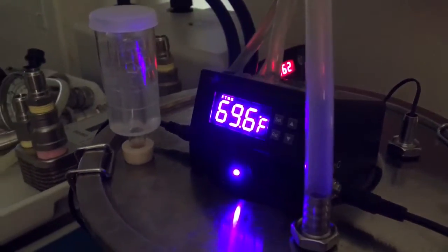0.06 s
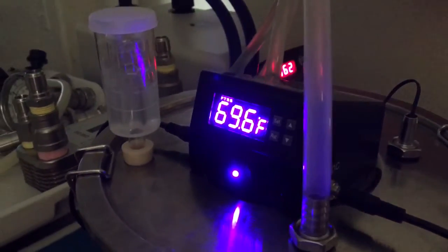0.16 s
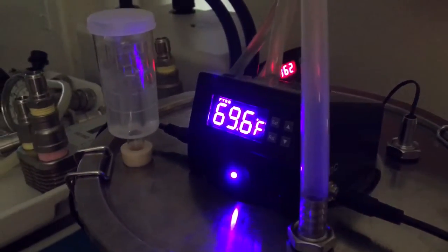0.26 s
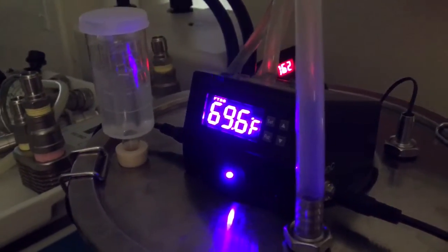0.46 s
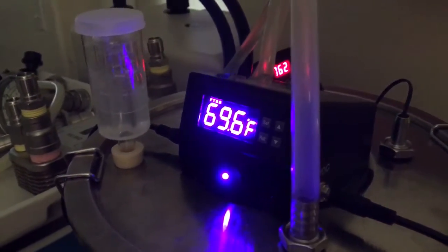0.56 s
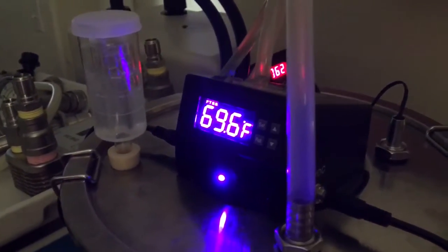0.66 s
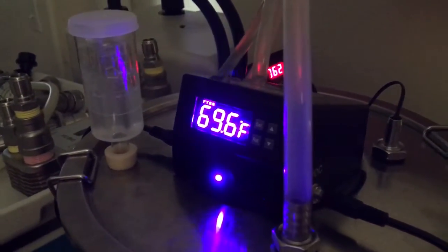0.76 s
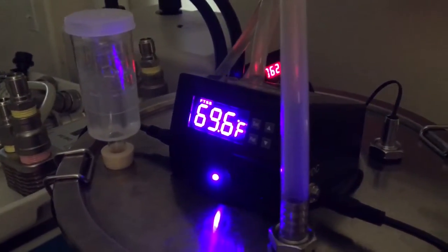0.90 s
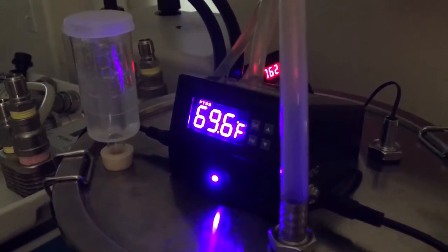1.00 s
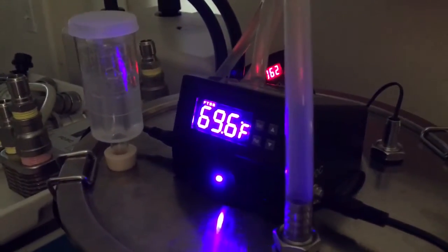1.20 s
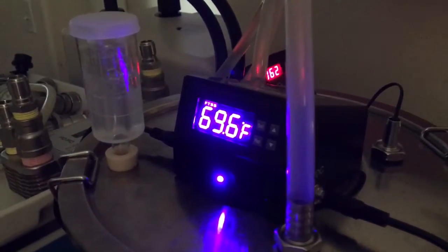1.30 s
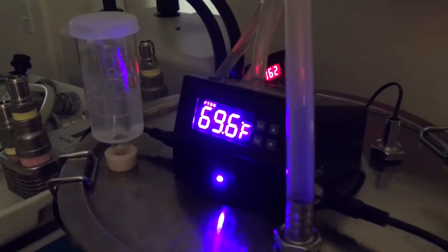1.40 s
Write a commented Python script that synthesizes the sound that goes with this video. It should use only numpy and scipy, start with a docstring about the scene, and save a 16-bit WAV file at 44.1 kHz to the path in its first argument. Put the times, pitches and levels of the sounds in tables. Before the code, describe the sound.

Gas glugs through a plastic airlock in fading, uneven bubbles over low room hum.

```python
"""A low hum fills a small room; then comes one big gulp, and a run of bubbles that grow quieter.
Gas is breaking through the liquid in the airlock of a steel vessel. Each bubble gives a low rising
glug, a hollow pop in the plastic chamber and a tick of spray, and the steel rings on faintly.
Gas hisses thinly behind the first bubbles, and the stirred liquid fizzes behind the later ones."""
import sys
import numpy as np
from scipy import signal
from scipy.fft import rfft, irfft
from scipy.io import wavfile

SR = 44100
rng = np.random.default_rng(int(sys.argv[2]) if len(sys.argv) > 2 else 0)


def log_audio(samples):
    """Write samples as a 16-bit WAV file to the path given in sys.argv[1]."""
    # one column per channel
    frames = np.atleast_2d(samples).T
    # limit to full scale, then quantise
    limited = np.clip(frames, -1, 1)
    pcm = np.round(limited * 32767).astype(np.int16)
    wavfile.write(sys.argv[1], SR, pcm)


N = 63945

# Bursting bubbles: t/s, swell time/s, then level/dB of glug, thump, hollow, pop, snap and spray
BUBBLES = [ (0.174, 0.0043, -80, -71, -61, -62, -55.5, -67.5),
           (0.196, 0.0035, -40, -61, -46.5, -53, -38.5, -46),
           (.2055, 0.0037, -22, -27.5, -26, -24, -40.5, -36.5),
           (.236, 0.00076, -41.5, -38.5, -43, -38, -63, -72),
           (0.273, 0.0034, -32.5, -41.5, -59, -69, -67, -75),
           (0.2901, 0.0015, -63, -52, -48, -71, -48.5, -45),
           (0.3864, 0.0033, -58, -36.5, -34, -30.5, -34.5, -37.5),
           (0.412, 0.0011, -53, -45, -35.5, -64, -46, -48),
           (.4400, 0.0029, -24, -32, -25.5, -34, -40.5, -37),
           (0.53, 0.0012, -36, -56, -53, -58, -48, -45.5),
           (0.6033, 0.0027, -33.5, -32.5, -31.5, -33.5, -33.5, -33.5),
           (.619, 0.0043, -33.5, -34.5, -31.5, -35.5, -45.5, -41.5),
           (0.7434, 0.0022, -30, -34.5, -35.5, -52, -44.5, -42.5),
           (0.8091, 0.0023, -42, -34.5, -31, -37.5, -41, -37),
           (0.834, 0.0019, -49, -43.5, -39.5, -72, -67, -65),
           (0.857, 0.0033, -34, -37, -34.5, -47.5, -47.5, -46.5),
           (.938, 0.0065, -42, -40, -37.5, -48, -44.5, -43.5),
           (1.0040, 0.00087, -45, -41, -42.5, -57, -48.5, -44.5),
           (1.030, 0.0013, -37, -44, -44.5, -50.5, -48, -49),
           (1.072, 0.00079, -50.5, -42, -55, -53, -47.5, -46),
           (1.107, 0.0012, -40, -40.5, -43.5, -44.5, -50, -50.5),
           (1.175, 0.0013, -44.5, -40.5, -48, -53, -50, -54.5),
           (1.206, 0.0015, -51, -42, -56, -62, -51, -55.5),
           (1.237, 0.0011, -52.5, -45, -59, -52.5, -60, -59), (1.277, 0.0073, -44, -52, -57, -58, -56, -57),
           (1.332, 0.0064, -40.5, -45.5, -50, -61, -59, -59),
           (1.386, 0.0033, -47.5, -47, -59, -77, -61, -78)]


def amp(db):
    """Turns decibels into a number to multiply by."""
    return 10 ** (np.asarray(db) / 20)


def unit(x):
    """Scales a signal to an average strength (rms) of 1."""
    return x / np.sqrt(np.mean(x ** 2) + 1e-20)


def add(mix, s, sound):
    """Mixes a sound in, starting at s seconds."""
    part = mix[max(round(s * SR), 0):][:len(sound)]
    part += sound[:len(part)]


def colour(x, points, lo=1, hi=SR):
    """Shapes a sound's bass and treble by points (f/Hz, level/dB), softly cut off at lo and hi Hz."""
    hz = np.fft.rfftfreq(len(x), 1 / SR) + 1
    f, db = np.transpose(points)
    edges = 1 / np.sqrt((1 + (lo / hz) ** 12) * (1 + (hz / hi) ** 12))
    gain = amp(np.interp(np.log(hz), np.log(f), db))
    return unit(irfft(rfft(x) * edges * gain, len(x)))


def fade(t, t60):
    """Dies away by 60 dB every t60 seconds."""
    return np.exp(-np.log(1000) * t / t60)


def rise(t, rise_s):
    """A soft start, from 0 up to 1."""
    return 1 - np.exp(-(t / rise_s) ** 2)


def tone(hz):
    """A pure tone that follows a pitch curve."""
    return np.sqrt(2) * np.sin(2 * np.pi * (np.cumsum(hz) / SR + rng.random()))


def ringing(strikes, rise_s, t60):
    """How strongly a thing rings when struck again and again (strikes: t/s, level/dB)."""
    t = np.arange(N) / SR
    ages = [(np.maximum(t - s, 0), db) for s, db in strikes]
    return np.sqrt(sum((amp(db) * rise(age, rise_s) * fade(age, t60)) ** 2 for age, db in ages))


def room():
    """Mains electricity hums over a soft low rush."""
    hum_tones = [(119, -59.5), (241, -65.5)]  # f/Hz, level/dB
    rush_shape = [(20, -49), (55, -5), (110, -20.5), (240, -1.5), (330, -15.5), (600, -22), (900, -26.5),
                  (1350, -24.5), (3000, -38), (10400, -44.5), (13000, -46)]  # f/Hz, relative level/dB
    rush = amp(-59.5) * colour(rng.standard_normal(N), rush_shape)
    return rush + sum(amp(db) * tone(np.full(N, hz)) for hz, db in hum_tones)


def chamber():
    """The plastic chamber favours some pitches over others; returns rows of f/Hz, level/dB."""
    broad_shape = [(50, -27), (110, 4), (190, -2), (240, -5), (385, 1), (490, -10), (595, -2.5),
                   (690, -6.5), (800, -8), (1000, -3), (1130, -6), (1320, 0.5), (1650, -16.5),
                   (2150, -13.5), (2850, -22), (3800, -25), (5400, -16), (6800, -17.5), (10600, -10),
                   (12500, -21.5), (15800, -39)]  # f/Hz, relative level/dB
    hz = np.arange(50, 16500, 25.)
    f, db = np.transpose(broad_shape)
    # Narrow peaks and dips: a random point every 120 Hz, about 3 dB in the treble, less below 2500 Hz.
    ripple = np.interp(hz / 120, np.arange(600), rng.standard_normal(600))
    ripple_db = 3 * unit(ripple) * np.minimum(hz / 2500, 1) ** 2
    return np.transpose([hz, np.interp(np.log(hz), np.log(f), db) + ripple_db])


def burst(swell_s, levels_db, chamber_shape):
    """A bubble's skin tears in a flurry of clicks that die in the chamber and echo in the room."""
    # Thump, hollow, pop, snap and spray, from low to high:
    # lowest f/Hz, extra swell time/s, tear level/dB, tear t60/s, echo level/dB, echo t60/s
    bands = [(77, 0.0017, -8, 0.36, -10.5, 0.74), (263, 0.00067, -8.5, 0.083, -14, 0.42),
             (764, 0.0015, -2.5, 0.088, -20.5, 0.66), (1673, 0.0001, -2.5, 0.083, -10, 0.5),
             (3990, 0.00023, -0.5, 0.071, -8, 0.38)]
    clicks_per_s, click_share = 2800, 0.6
    t, out = np.arange(SR) / SR, np.zeros(SR)
    tops = [band[0] for band in bands[1:]] + [SR]
    for db, top, (lo, lag_s, tear_db, tear_t60, echo_db, echo_t60) in zip(levels_db, tops, bands):
        rise_s = swell_s + lag_s
        clicks = unit(rng.standard_normal(SR) * (rng.random(SR) < clicks_per_s / SR))
        crackle = np.sqrt(click_share) * clicks + np.sqrt(1 - click_share) * rng.standard_normal(SR)
        tear = amp(tear_db) * colour(crackle, chamber_shape, lo, top)
        tear *= fade(np.maximum(t - 2 * rise_s, 0), tear_t60)
        echo = amp(echo_db) * colour(rng.standard_normal(SR), chamber_shape, lo, top)
        out += amp(db) * rise(t, rise_s) * (tear + echo * fade(t, echo_t60))
    return out


def knock(swell_s, thump_db, hollow_db):
    """A bubble knocks the air in the chamber; the moving liquid shifts its notes a little each time."""
    # The air's deep notes and its hollow ones: f/Hz, relative level/dB, t60/s
    thump_notes = [(124.2, -5.5, 0.18), (181, -4.5, 0.11)]
    hollow_notes = [(274.8, -17, 0.16), (315.7, -12.5, 0.16), (382.6, -10.5, 0.12), (588.3, -10.5, 0.11)]
    t, rise_s = np.arange(SR // 2) / SR, swell_s + 0.0022
    age = np.maximum(t - 2 * rise_s, 0)
    out = np.zeros(len(t))
    for level_db, notes in (thump_db, thump_notes), (hollow_db, hollow_notes):
        for hz, db, t60 in notes:
            shifted_hz = hz * (1 + 0.016 * rng.standard_normal())
            out += amp(level_db + db) * fade(age, t60) * tone(np.full(len(t), shifted_hz))
    return rise(t, rise_s) * out


def glugs():
    """The gas pocket rings low; each bubble pulls its pitch down, and it rises as liquid falls back."""
    rest_hz, pitch_sag, rise_s = 215.6, 0.12, 0.00826
    strikes = [(s, glug_db) for s, _, glug_db, *_ in BUBBLES]
    level = ringing(strikes, rise_s, t60=0.344)
    freshness = ringing(strikes, rise_s, t60=0.075) / (level + 1e-9)
    return level * tone(rest_hz * (1 - pitch_sag * freshness))


def vessel():
    """The steel rings faintly and unevenly after the pops."""
    steel_notes = [(351.5, -33.5, 0.92), (968, -33.5, 0.56), (1228, -41, 0.62), (1352, -40.5, 0.54),
                   (2120, -34.5, 0.26), (2095, -40.5, 0.11)]  # f/Hz, relative level/dB, t60/s
    wavers_per_s, waver_db, pitch_waver = 38, 6, 0.00275
    # A pop that is 1 dB louder strikes the steel 0.52 dB harder.
    strikes = [(s, 0.52 * pop_db) for s, _, _, _, _, pop_db, _, _ in BUBBLES]
    t, out = np.arange(N) / SR, np.zeros(N)
    for hz, db, t60 in steel_notes:
        waver = np.interp(t * wavers_per_s, np.arange(100), rng.standard_normal(100))
        level = amp(db + waver_db * waver) * ringing(strikes, rise_s=0.0054, t60=t60)
        out += level * tone(hz * (1 + pitch_waver * waver))
    return out


def blips():
    """Small bubbles each sing a short, slightly rising note as they pinch off."""
    small_bubbles = [(0.196, 2535, -42, 0.035), (.206, 303, -21, 0.013), (0.213, 1321, -25.5, 0.038),
                     (0.219, 986, -34, 0.057), (0.216, 382, -30.5, 0.1), (0.277, 1302, -37.5, 0.092),
                     (.389, 1056, -31, 0.048), (.812, 2880, -44.5, 0.033), (.815, 576, -44, 0.031),
                     (1.005, 2050, -47.5, 0.035), (1.008, 1354, -43, 0.025)]  # t/s, f/Hz, level/dB, t60/s
    rise_s, glide_per_s = 0.003, 0.24
    t, out = np.arange(SR // 2) / SR, np.zeros(N)
    for s, hz, db, t60 in small_bubbles:
        level = amp(db) * rise(t, rise_s) * fade(np.maximum(t - 2 * rise_s, 0), t60)
        add(out, s, level * tone(hz * (1 + glide_per_s * t)))
    return out


def squeeze():
    """Gas squeezes through the airlock's wet stem with a thin hiss."""
    hiss_levels = [(.22, -61), (.275, -79), (.3, -58), (.412, -78), (0.43, -50), (.445, -86), (.57, -60)]  # t/s, level/dB
    s, db = np.transpose(hiss_levels)
    hiss = colour(rng.standard_normal(N), [(2200, -45), (5400, 0), (8600, -45)])
    return hiss * np.interp(np.arange(N) / SR, s, amp(db), left=0, right=0)


def froth(chamber_shape):
    """The stirred liquid fizzes softly as the bubbling dies down."""
    start_s, clicks_per_s = 0.62, 670
    age = np.maximum(np.arange(N) / SR - start_s, 0)
    fizz = rng.standard_normal(N) * (0.32 + (rng.random(N) < clicks_per_s / SR))
    return amp(-55.5) * rise(age, rise_s=0.71) * colour(fizz, chamber_shape, lo=290)


def scene():
    """Mixes the bubbling airlock with the hum of the room."""
    chamber_shape = chamber()
    mix = room() + squeeze() + froth(chamber_shape) + glugs() + vessel()
    for s, swell_s, _, thump_db, hollow_db, pop_db, snap_db, spray_db in BUBBLES:
        add(mix, s, burst(swell_s, [thump_db, hollow_db, pop_db, snap_db, spray_db], chamber_shape))
        add(mix, s, knock(swell_s, thump_db, hollow_db))
    return (mix + blips())[None]


def record(dry):
    """Cuts off the highest treble, above 15900 Hz."""
    treble_cut = signal.firwin(511, 15900, window=("kaiser", 9), fs=SR)
    return signal.oaconvolve(dry, treble_cut[None], "same")


dry = scene()
out = record(dry)
log_audio(out)
```